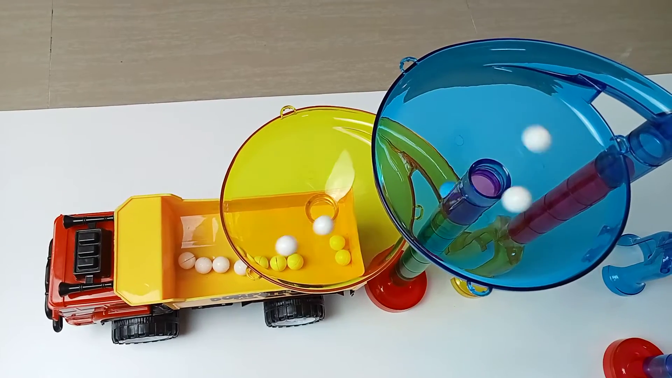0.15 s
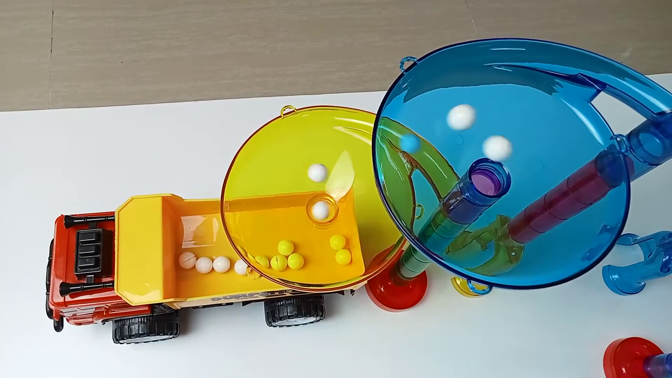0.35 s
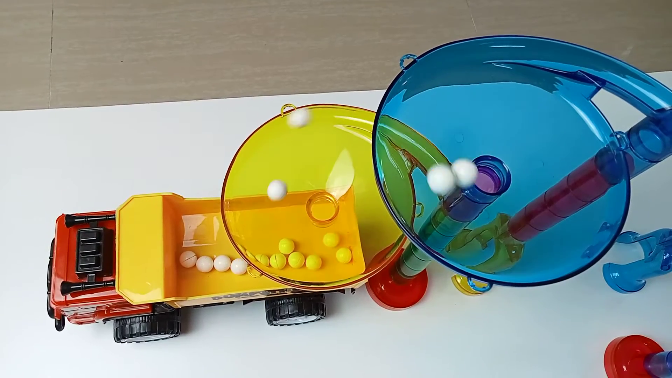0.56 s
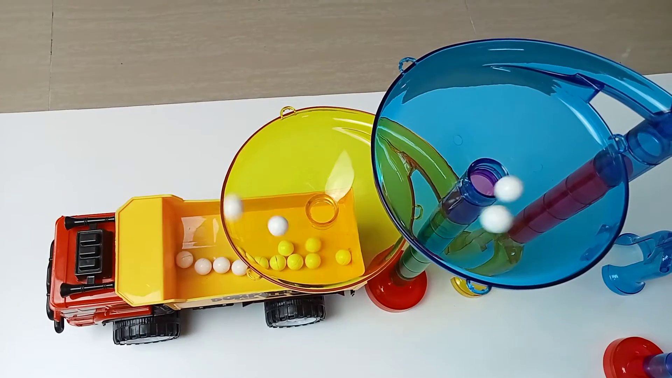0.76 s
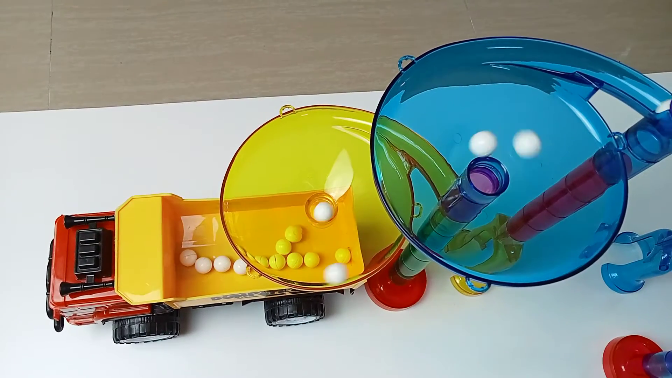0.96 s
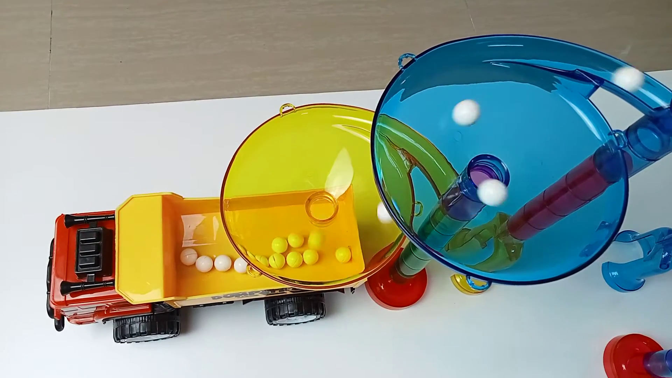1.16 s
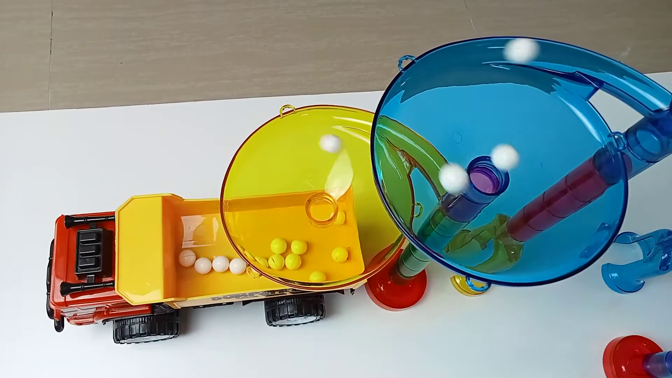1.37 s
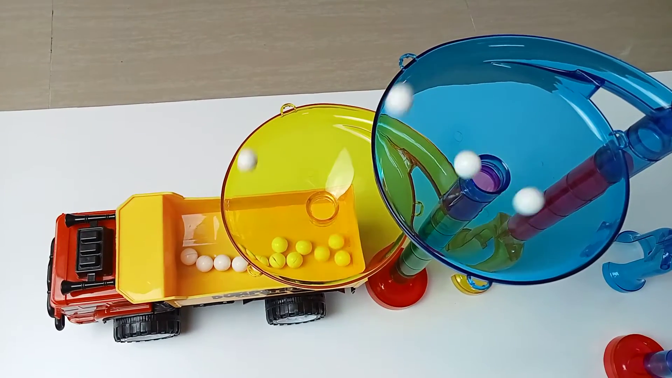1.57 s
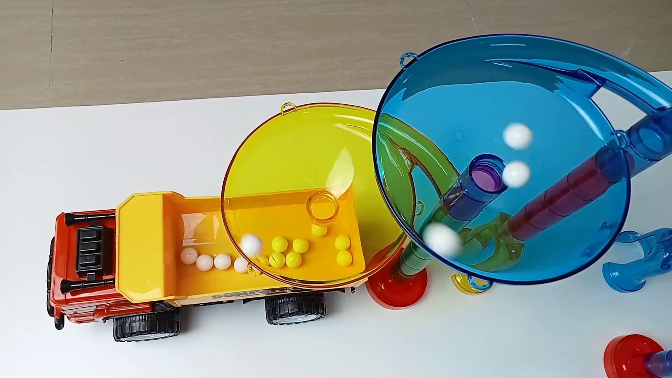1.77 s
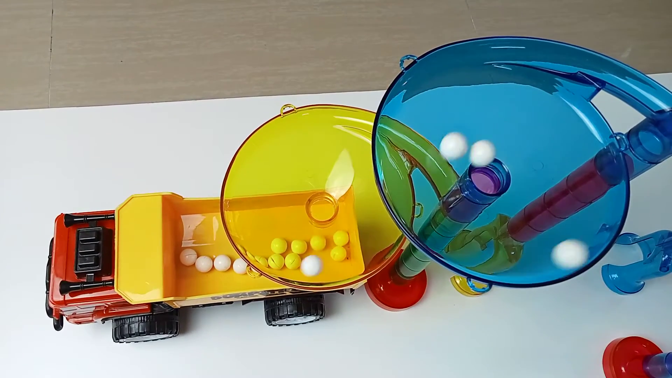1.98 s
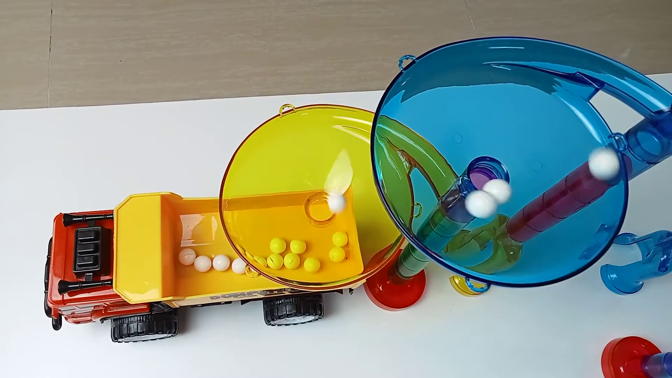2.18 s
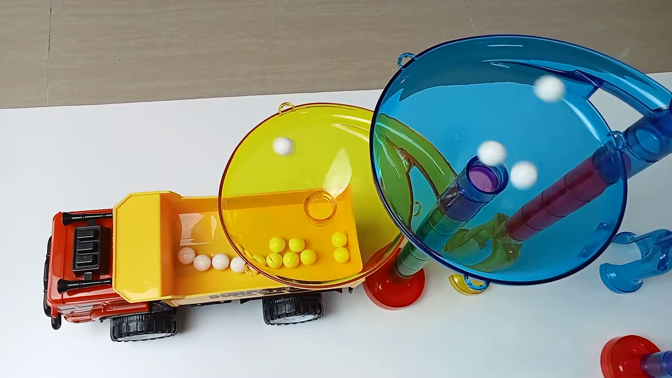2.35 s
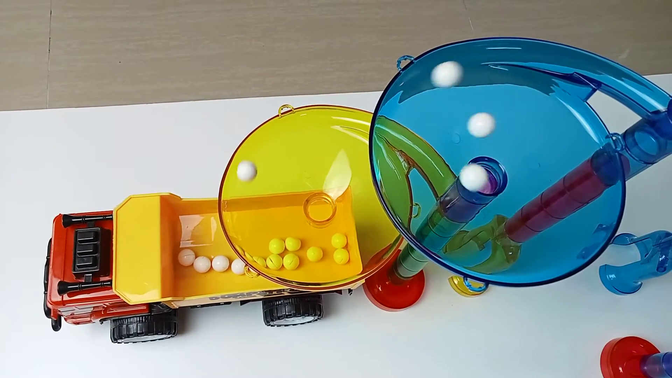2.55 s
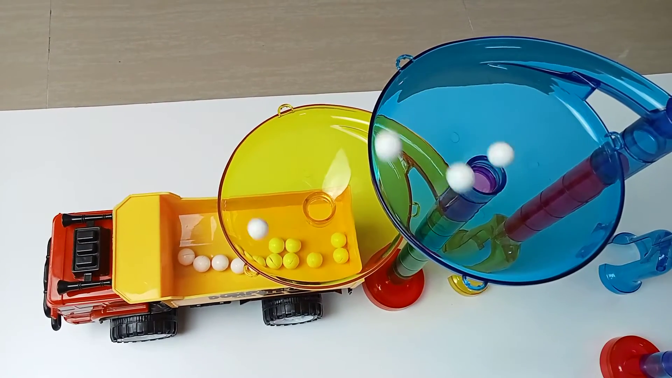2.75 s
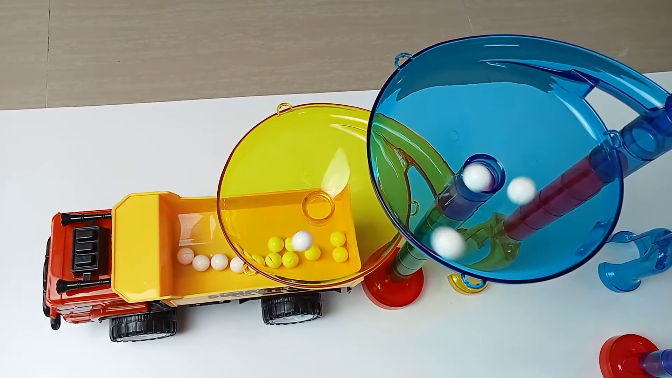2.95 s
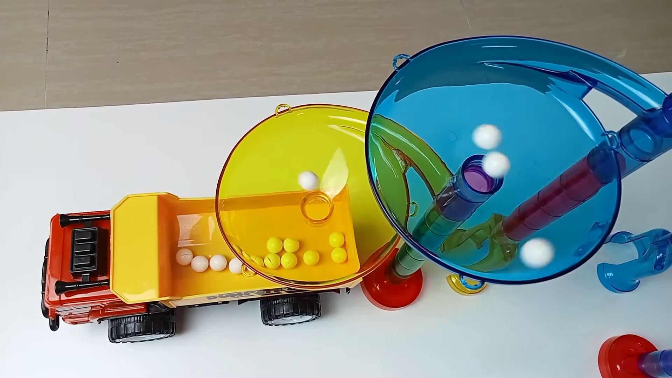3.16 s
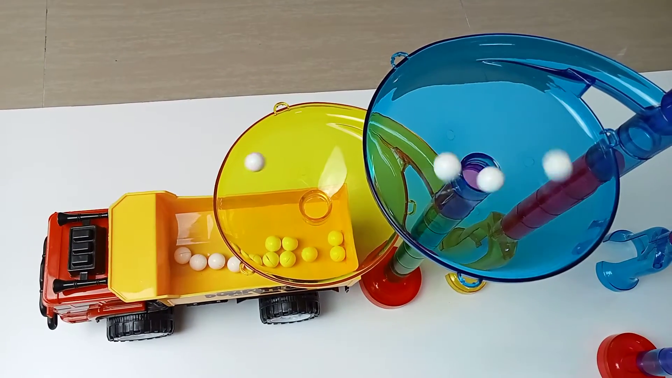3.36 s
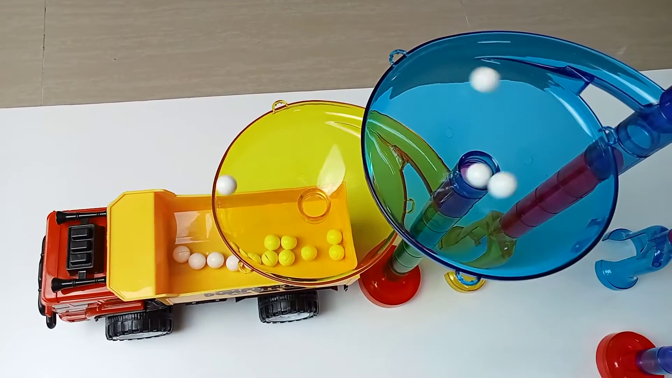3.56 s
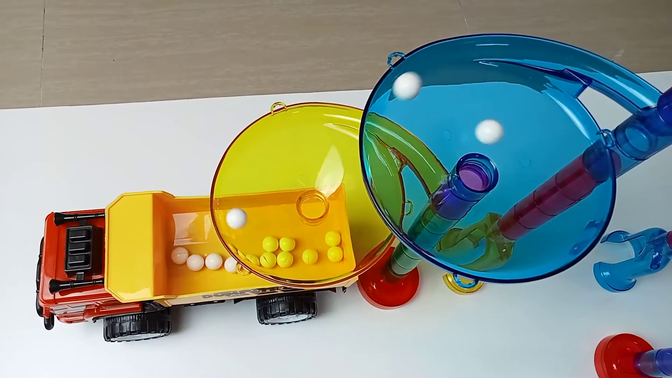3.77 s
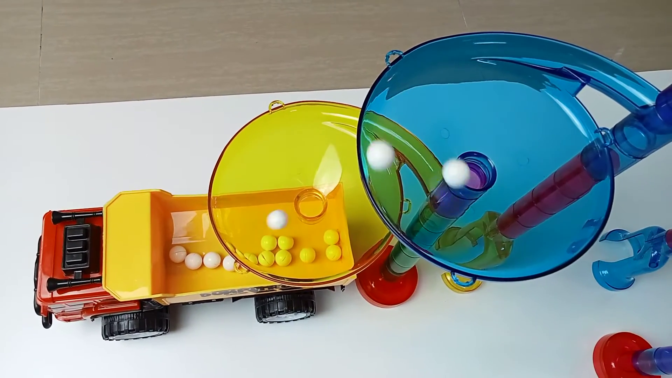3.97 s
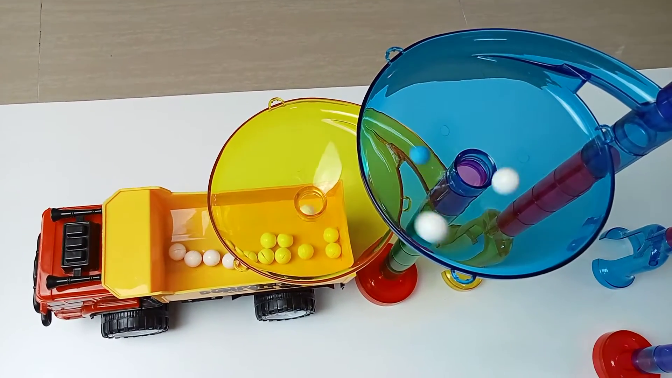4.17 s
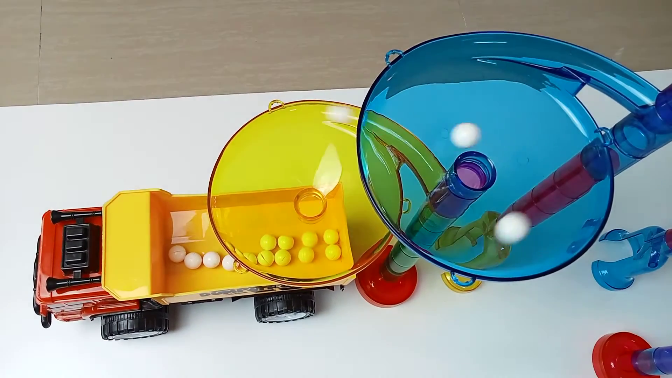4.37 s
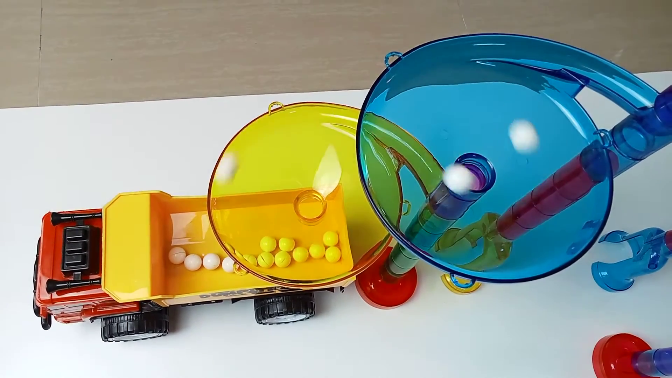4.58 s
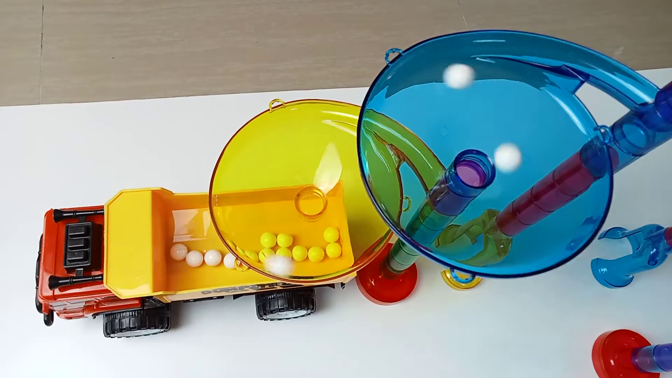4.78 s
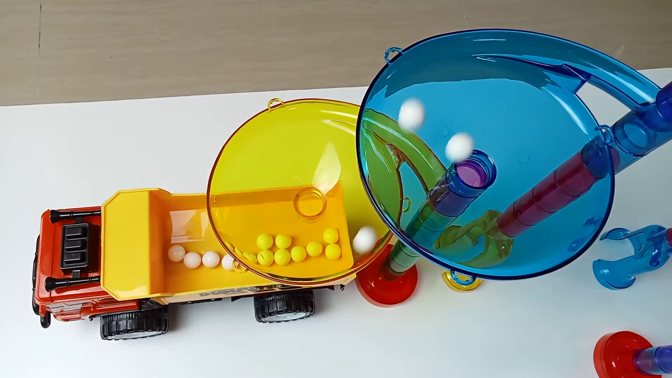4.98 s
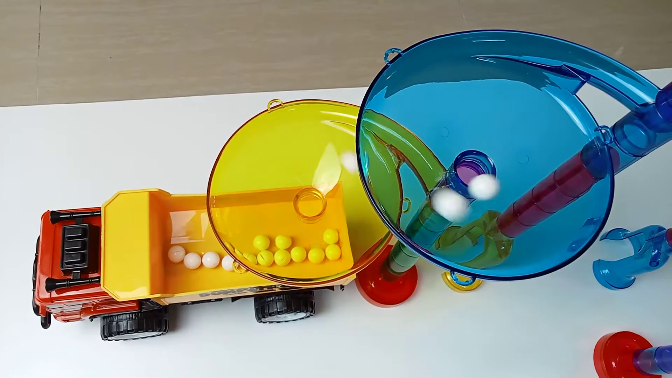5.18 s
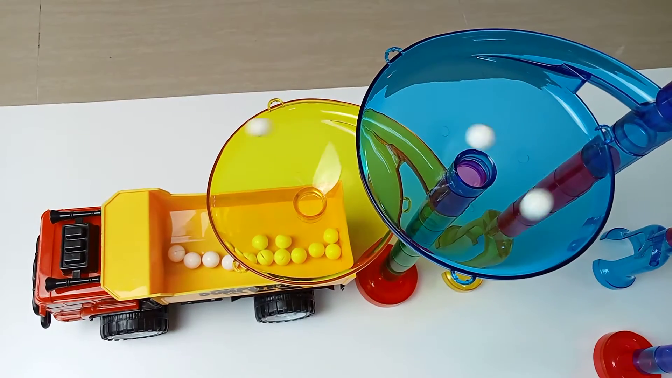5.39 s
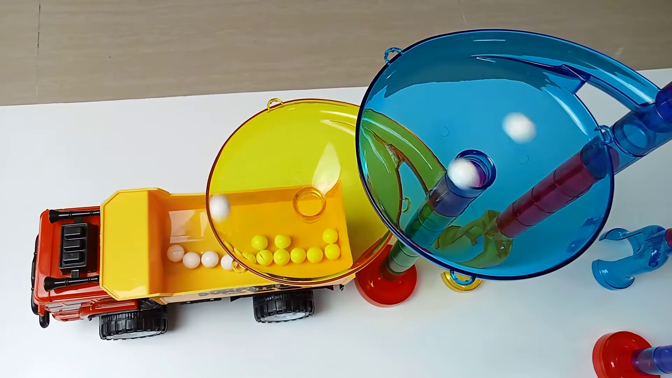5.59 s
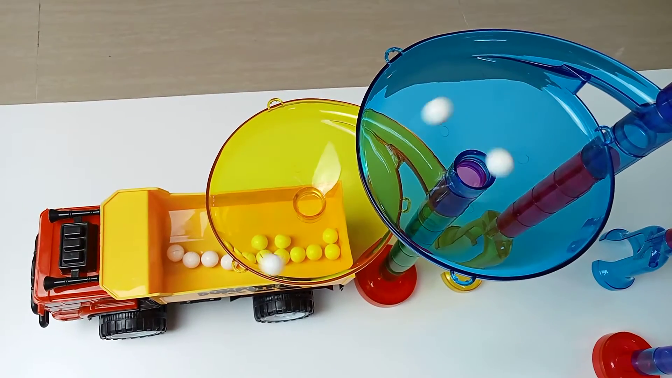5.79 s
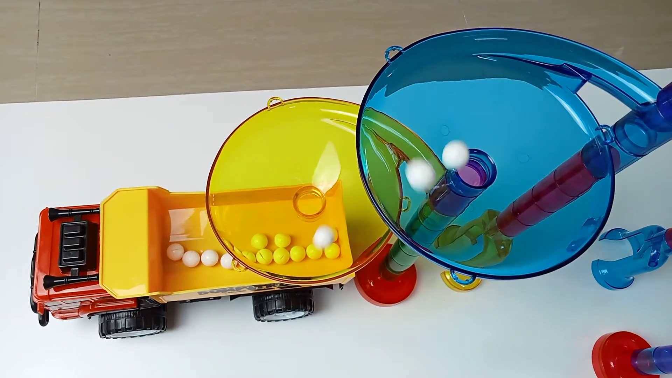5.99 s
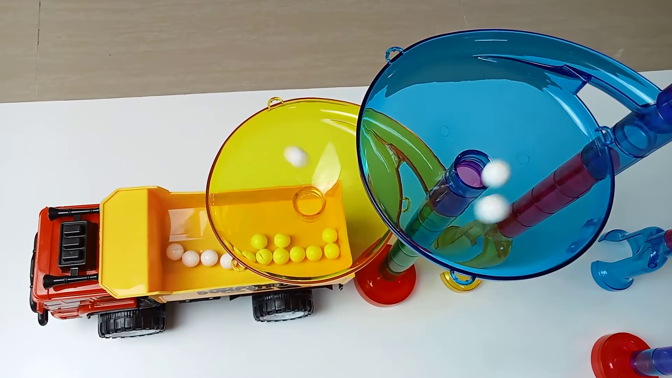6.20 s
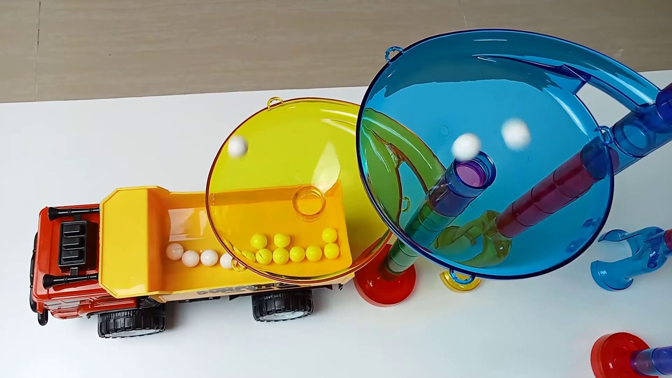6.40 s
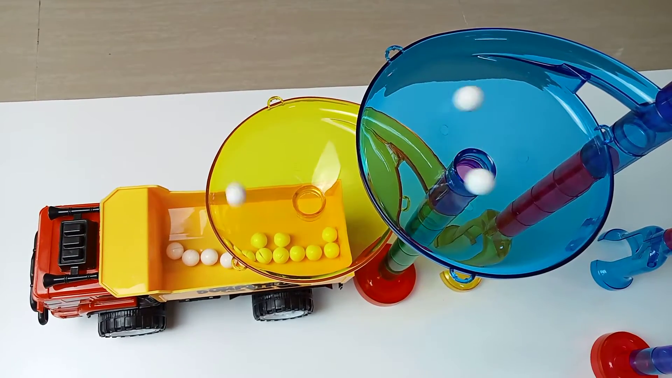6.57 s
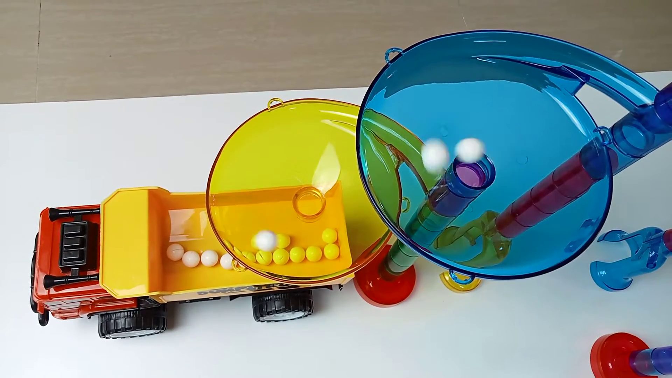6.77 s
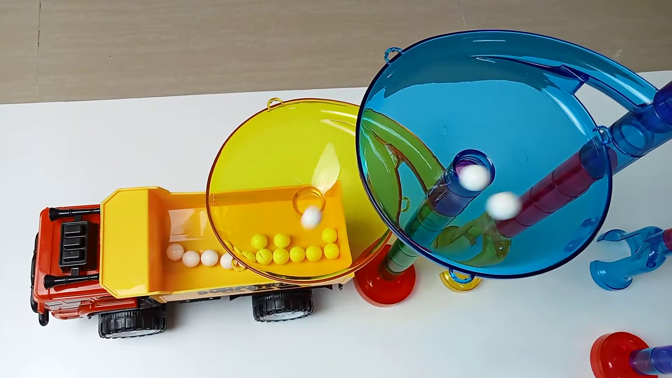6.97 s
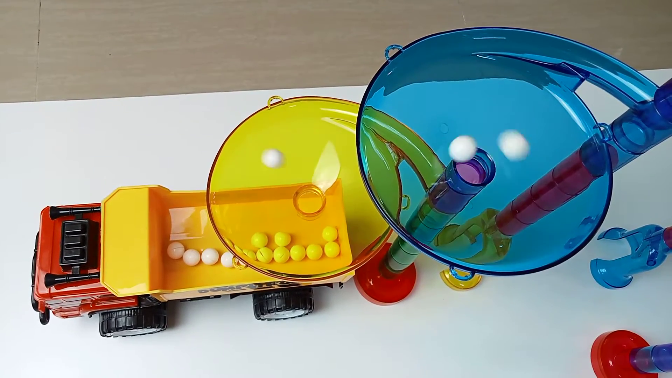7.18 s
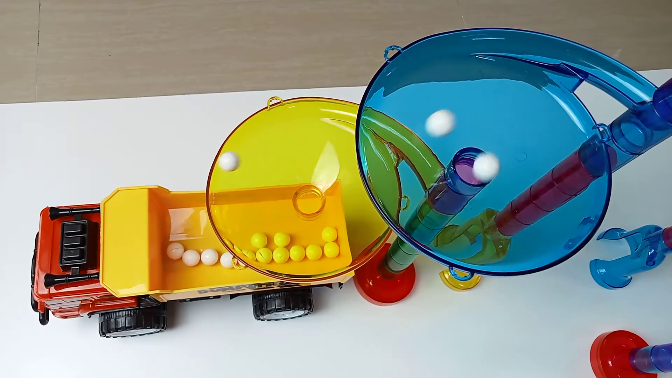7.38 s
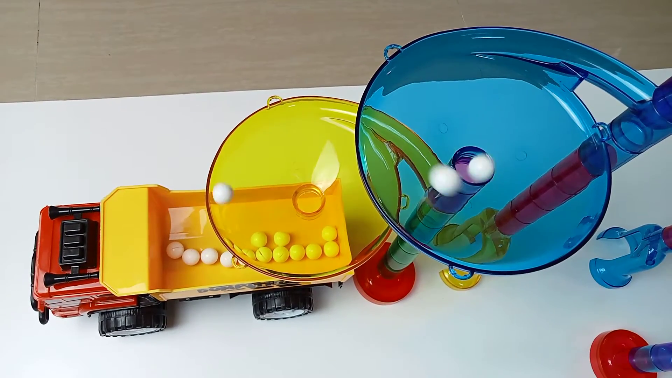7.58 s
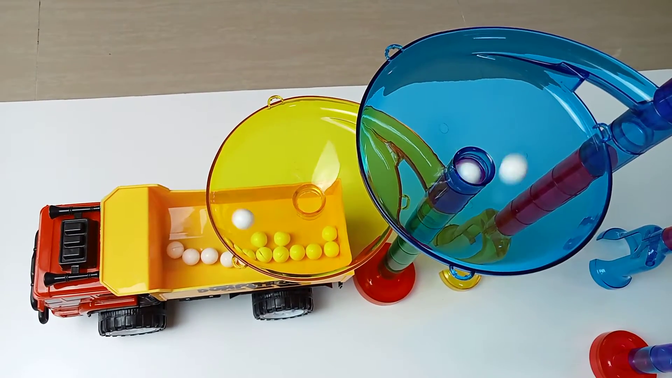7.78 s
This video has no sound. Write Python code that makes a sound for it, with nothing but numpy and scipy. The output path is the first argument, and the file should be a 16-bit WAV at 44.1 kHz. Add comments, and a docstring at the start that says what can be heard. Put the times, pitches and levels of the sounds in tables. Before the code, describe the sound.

Close up in a live, bare room, small hard balls run through thin plastic over faint low room noise and hum. A sharp, dense rattle opens the first 0.15 s, with a tiny high ping as two balls meet. Lighter clatters follow at 0.35-0.5, 0.7-0.95 and 1.1-1.2 s. A ball drops into a funnel at 0.6 s with a hollow clack and quickening, softening bounces; another lands at 1.3 s, with weaker ones at 1.7 and 1.9. Rumbling, raspy circling continues throughout, gently swelling and fluttering. Dry ticks gather between 1.75 and 2.7 s, with a grainy skitter at 2.3 and another at 3.2. The strongest clatter returns from 3.65 to 4.25 s, with high pings near 4.0 and 4.15. A bright, hollow drop bounces at 4.35, a faint one at 4.65. Afterwards balls keep circling, with scattered ticks and brief chirping scrapes, ending on a firmer tick near 7.8 s.

```python
"""Small hard balls run a plastic marble run in a live room, close to one microphone.
Room noise, a faint hum and a funnel rumbling under circling balls (noisy bumps through resonances) run throughout.
Balls clatter down the track (bursts of dying modes) until 1.2 s, with a high sine ping as two meet.
From 0.6 s some drop into the funnel, clack hollowly and bounce; ticks join at 1.2 s, grainy skitters at 2.3 s.
More clatter comes from 3.65 s and drops from 4.3 s; then the balls circle and tick to the end."""
import sys
import numpy as np
from scipy import signal
from scipy.fft import rfft, irfft, next_fast_len
from scipy.io import wavfile
from scipy.ndimage import map_coordinates

SR = 44100
rng = np.random.default_rng(int(sys.argv[2]) if len(sys.argv) > 2 else 0)


def int16_out(signal):
    """Quantize to a 16-bit WAV file."""
    q = np.round(np.clip(np.atleast_2d(signal).T, -1, 1) * 32767)
    wavfile.write(sys.argv[1], SR, q.astype(np.int16))


N = 345744

SIZE = 8192  # samples in one impact
IMPACT_S, HZ = np.arange(SIZE) / SR, np.fft.rfftfreq(SIZE, 1 / SR)
TOP_HZ = 15700  # the microphone's upper band limit
RATTLES_PER_S, NOTE_T60_S = 60, 0.073
FLIGHT_SHRINK, CLACK_LOSS_DB = .7, 7  # from one bounce to the next
RASP_GROWS = 1.46  # the rasp's level swings this many times as far in dB as the rumble's

# All table levels are relative; each layer is set in scene().
# Room noise spectrum: (frequency [Hz], level [dB])
AIR_COLOUR = [(20, -14), (45, -11), (100, 11), (200, -2), (400, -2.5), (1000, -16), (4000, -36),
              (16000, -69.5)]
# Appliance hum partials: (frequency [Hz], level [dB])
HUM_PARTIALS = [(96.9, -90), (242.2, -62), (290.7, -65.5), (484.5, -59)]
# Circling balls: (time [s], rolling level [dB])
ROLLING_LEVEL = [(0, -29), (.3, -39.5), (1.2, -40.5), (1.28, -43), (1.84, -38), (1.95, -44), (2.22, -42.5),
                 (2.34, -36), (2.66, -40), (3.5, -38.5), (3.68, -33.5), (3.78, -40), (4.92, -42),
                 (5.06, -38.5), (5.6, -38), (6.1, -41), (6.48, -38), (6.62, -41), (7, -41.5), (7.2, -38),
                 (7.33, -40.5), (7.65, -43), (7.84, -34.5)]
# Resonances of the thin plastic: (frequency [Hz], width [Hz], lift [dB])
PLASTIC_RESONANCES = [(671.5, 78.5, 12.5), (1255, 28, -1.5), (1372, 193, 7), (2057, 104, 3),
                      (3010, 22, 3.5), (3790, 510, 5.5), (7265, 506, 13), (12900, 410, 3.5)]
# Smooth colour of rolling, under those resonances: (frequency [Hz], level [dB])
ROLLING_COLOUR = [(100, -30), (500, -15), (850, -2), (1100, 8), (1550, 3), (1800, 3.5), (2600, -1.5),
                  (3700, -12.5), (4700, -27), (6000, -28.5), (8200, -30.5), (11000, -37), (16000, -45)]
# Smooth colour of track knocks, ticks, hops and skitters: (frequency [Hz], level [dB])
CONTACT_COLOUR = [(100, -17), (450, -8), (650, -5.5), (1000, 6), (1400, 7.5), (2400, 15), (3800, 5.5),
                  (4500, -5), (5700, -13.5), (9000, -18), (11000, -26), (15500, -21)]
# A ball rattles down a stretch of track: (start [s], end [s], rattle level [dB],
# wall ring before jitter [Hz], lingering note before jitter [Hz], note over knock [dB])
TRACK_RUNS = [(0.013, .15, -11, 4050, 1372, -7.5), (0.351, .43, -29, 3020, 1450, -7),
              (0.444, .5, -11, 3600, 1374, -8.5), (0.698, .95, -27.5, 3050, 2940, -2),
              (1.099, 1.21, -21.5, 2170, 1298, -3.5), (3.65, 3.76, -16, 3730, 1485, -9),
              (3.8, 3.987, -14.5, 3900, 1392, -12.5), (4.061, 4.24, -23, 2160, 1218, -14)]
# Hard knocks of those runs: (time [s], knock level [dB], crack level [dB])
HARD_KNOCKS = [(0.0248, -0.5, -21.5), (0.0334, -5.5, -19.5), (0.0395, -3, -17.5), (0.0692, -6.5, -20),
               (0.1311, -10, -20.5), (0.1418, -11, -18), (0.3534, -15.5, -31.5), (0.4455, -10.5, -35),
               (0.4532, -10.5, -19.5), (0.4637, -11, -28), (0.4728, -9, -28), (0.4934, -15, -20.5),
               (0.7143, -19, -25), (0.8025, -15, -27.5), (0.8614, -21, -24), (0.8812, -17, -20.5),
               (0.9125, -9.5, -16.5), (0.9207, -8.5, -19), (3.7194, -15, -37), (3.7323, -10.5, -20),
               (3.8077, 2.5, -18.5), (3.8211, 2, -22), (3.8641, -5.5, -31), (3.8948, -4, -23),
               (3.933, -2.5, -32), (3.9603, -7, -32), (3.9996, -1, -14.5), (4.0677, -4.5, -21),
               (4.12, -7, -21.5), (4.156, -8.5, -20), (4.212, -5, -40), (4.2217, -8, -23.5),
               (4.2462, -5.5, -28.5)]
# Ball meets ball: (time [s], level [dB], pitch [Hz])
BALL_PINGS = [(0.034, -13, 11900), (3.3368, -44.5, 12700), (4, -18.5, 12600), (4.1555, -23, 12600),
              (5.5139, -44, 13000), (6.8279, -48, 12100), (7.7308, -43, 12000)]
# A ball lands in the funnel: (time [s], thud level [dB], clack level [dB],
# first bounce's flight [s], thud loss per bounce [dB], ring of the struck spot [Hz])
FUNNEL_DROPS = [(0.596, -4, -15, .075, 10.5, 2080), (1.316, -2, -15.5, .0605, 8, 1900),
                (1.685, -22, -34, 0.049, 11, 1860), (1.874, -23, -49, 0.049, 11, 2120),
                (4.341, -7.5, -11.5, .082, 6, 2830), (4.642, -24, -41, 0.1, 6, 2530)]
# Smooth colour of funnel clacks: (frequency [Hz], level [dB])
CLACK_COLOUR = [(200, -108), (900, 7), (1400, -2), (1800, -7), (2600, 3), (3300, -5), (4000, -11.5),
                (5500, -21), (8500, -21.5), (11000, -29), (16000, -37)]
# Bending modes of the funnel before jitter: (frequency [Hz], level [dB], t60 [s])
BOWL_MODES = [(426, -17, 0.05), (496, -8, 0.031), (628, -8.5, 0.037), (790, 2, 0.045), (895, 6, 0.045),
              (983.5, 1.5, 0.066), (1140, -8, 0.023)]
# Circling balls touch or land firmly after a hop: (time [s], knock level [dB], crack level [dB])
FIRM_TICKS = [(1.1813, -35, -51), (1.7474, -28, -43), (1.8467, -19, -40.5), (2.1655, -23.5, -53),
              (2.2727, -17.5, -46), (2.3814, -17.5, -45), (2.4912, -17.5, -44), (2.5551, -15, -32.5),
              (2.604, -21, -40.5), (2.7177, -20, -45), (3.235, -19.5, -47), (4.7167, -18.5, -44.5),
              (5.4266, -22, -43.5), (5.5162, -15.5, -38.5), (5.57, -20, -45), (5.705, -15.5, -36.5),
              (6.4669, -15.5, -37), (6.8987, -26, -44.5), (7.1501, -20, -51), (7.3149, -27.5, -48),
              (7.3868, -26.5, -50), (7.5256, -15, -42), (7.6817, -23.5, -52), (7.8314, -13.5, -29.5)]
# A ball skitters in very fast bounces: (time [s], length [s], level [dB], starting pitch [Hz])
FAST_SKITTERS = [(2.3, 0.055, -39.5, 2550), (3.222, 0.033, -34, 2200), (4.6, 0.04, -35.5, 1400),
                 (6.2, 0.086, -42, 2300), (6.806, 0.049, -40.5, 2200), (7.136, 0.053, -37.5, 2170),
                 (7.716, .06, -41, 2000)]
# Decay of the room: (frequency [Hz], t60 [s])
ROOM_DECAY = [(200, 0.52), (900, 0.7), (2900, 0.61), (4200, 0.43), (7500, 0.51), (15000, 0.21)]


def amp(db):
    """Decibels to amplitude."""
    return 10 ** (np.asarray(db) / 20)


def unit(x):
    """Scale to rms 1."""
    return x / np.sqrt(np.mean(x ** 2) + 1e-20)


def along(points, hz):
    """Interpolate (frequency, value) points on a log frequency axis."""
    f, v = np.transpose(points)
    return np.interp(np.log(hz + 1), np.log(f + 1), v)


def wobble(rate, size=N):
    """A smooth random curve with rate knots a second."""
    knots = rng.standard_normal(int(size * rate / SR) + 4)
    return map_coordinates(knots, [np.arange(size) * rate / SR])


def filtered(x, gain):
    """Apply a gain that depends on frequency."""
    m = next_fast_len(N + SIZE)
    return irfft(rfft(x, m) * gain(np.fft.rfftfreq(m, 1 / SR)), m)[:N]


def add(track, s, sound):
    """Mix a sound in at time s [s]."""
    i = int(np.clip(round(s * SR), 0, N - 1))
    track[i:i + len(sound)] += sound[:N - i]


def causal(gain):
    """The quickest (minimum-phase) impulse response that has this gain."""
    cepstrum = irfft(np.log(np.maximum(gain, 1e-6)))
    cepstrum[1:SIZE // 2] *= 2
    cepstrum[SIZE // 2 + 1:] = 0
    return irfft(np.exp(rfft(cepstrum)))


def plastic(colour, split_hz, spot_db=0):
    """Impulse responses of a resonant plastic part, below and above a split frequency."""
    lift = sum(db * np.exp(-.5 * ((HZ - hz) / width) ** 2) for hz, width, db in PLASTIC_RESONANCES)
    gain = amp(along(colour, HZ) + lift + spot_db)
    low = 1 / (1 + (HZ / split_hz) ** 10)
    return causal(gain * np.sqrt(low)), causal(gain * np.sqrt(1 - low))


def spot(hz, width, db):
    """Extra resonance of the struck place, in dB over frequency; width is a fraction of hz."""
    return db / (1 + ((HZ - hz) / (width * hz)) ** 2)


def even(sound):
    """Give a blow the energy of 5 ms at rms 1."""
    return sound / np.sqrt(np.sum(sound ** 2) / (.005 * SR))


def blow(body, t60, contact=0.18):
    """A sharp contact, then a new mix of crowded, quickly dying modes."""
    burst = rng.standard_normal(SIZE) * amp(-60 * IMPACT_S / t60)
    burst[0] = contact * np.linalg.norm(burst)
    return even(irfft(rfft(burst) * rfft(body)))


def bumps(rate, spread_db):
    """Random tiny impacts of uneven size, about rate a second, rms 1."""
    hits = rng.random(N) < rate / SR
    signs = rng.choice([-1, 1], N)
    sizes = amp(spread_db * np.clip(rng.standard_normal(N), -2, 2))
    return unit(hits * signs * sizes)


def whirr(hz, width):
    """A resonance driven by chance while its centre moves, rms 1."""
    phase = 2 * np.pi * np.cumsum(hz) / SR
    in_phase = wobble(width, size=len(hz)) * np.cos(phase)
    return unit(in_phase + wobble(width, size=len(hz)) * np.sin(phase))


def background(air_db, hum_db):
    """Low room noise and a slightly unsteady appliance hum of phase-wandering partials."""
    t = np.arange(N) / SR
    air = unit(filtered(rng.standard_normal(N), lambda hz: amp(along(AIR_COLOUR, hz))))
    hum = sum(amp(db) * unit(np.sin(2 * np.pi * hz * t + .6 * wobble(2.7))) for hz, db in HUM_PARTIALS)
    return amp(air_db) * air + amp(hum_db) * hum


def rolling(rumble_db, rasp_db, hollow_db, hop_db, flutter_db, hollow_hz):
    """Surface bumps drum on the funnel; fast balls rasp and skip in little hops."""
    s, db = np.transpose(ROLLING_LEVEL)
    rumble_level = np.interp(np.arange(N) / SR, s, db)
    rasp_level = db.mean() + RASP_GROWS * (rumble_level - db.mean()) + wobble(9)
    low, high = plastic(ROLLING_COLOUR, split_hz=1930)
    load = flutter_db * wobble(70)  # the pressure varies as the balls turn

    rumble = amp(rumble_level + rumble_db + load) * bumps(rate=2000, spread_db=1.5)
    rasp = amp(rasp_level + rasp_db + load) * bumps(rate=1200, spread_db=0.0)
    out = signal.fftconvolve(rumble, low / np.linalg.norm(low))
    out += signal.fftconvolve(rasp, high / np.linalg.norm(high))

    # the bowl's hollow note wanders as the balls move round it
    hollow = whirr(hollow_hz * (1 + .035 * wobble(8)), width=250)
    out = out[:N] + amp(rumble_level + hollow_db + load) * hollow

    # each little hop lands with a tap and a thin click
    wall, skin = plastic(CONTACT_COLOUR, split_hz=8800)
    for when, size in rng.random(size=(130, 2)):
        level = rumble_level[int(when * N)] + hop_db + 11 * size ** 2
        tap = blow(wall, t60=0.021)
        click = amp(-15.5) * blow(skin, t60=.012)
        add(out, when * N / SR, amp(level) * (tap + click))
    return out


def knock(knock_db, crack_db, ring_hz, note_hz, note_db):
    """A ball strikes a part of the track: its wall clacks, its edge glints and one note lingers."""
    part = spot(ring_hz * (1 + rng.normal(0, .04)), width=.07, db=8)
    glint = spot(8800 + 5000 * rng.random(), width=0.036, db=14.0)
    wall, skin = plastic(CONTACT_COLOUR, split_hz=5520, spot_db=part + glint)
    body, edge = blow(wall, t60=.027, contact=.15), blow(skin, t60=.025, contact=.25)
    fade = amp(-60 * IMPACT_S / NOTE_T60_S) * (1 - np.exp(-IMPACT_S / .001))
    note = even(fade * np.sin(2 * np.pi * note_hz * (1 + rng.normal(0, 0.011)) * IMPACT_S))
    return amp(knock_db) * (body + amp(note_db) * note) + amp(crack_db) * edge


def rattles(level_db, crack_db, spread_db, size=20):
    """Between the hard knocks the ball chatters against the track in light, uneven contacts."""
    out = np.zeros(N)
    for start, end, db, *part in TRACK_RUNS:
        for k, (slip, force) in enumerate(rng.random((size, 2))):
            s = start + (k + slip) / RATTLES_PER_S
            level = db + level_db + spread_db * (2 * force - 1)
            add(out, s, (s < end) * knock(level, level + crack_db, *part))  # silent past the run's end
    return out


def knocks(knock_db, crack_db):
    """Each hard knock rings the stretch of track that the ball is passing."""
    out = np.zeros(N)
    for s, body, crack in HARD_KNOCKS:
        # the run that holds this time, or lies nearest to it
        _, _, _, *part = min(TRACK_RUNS, key=lambda run: max(run[0] - s, s - run[1]))
        add(out, s, knock(body + knock_db, crack + crack_db, *part))
    return out


def pings(level_db, t60):
    """Colliding balls ring for a moment at one high pitch."""
    out = np.zeros(N)
    for s, db, hz in BALL_PINGS:
        add(out, s, amp(db + level_db - 60 * IMPACT_S / t60) * np.sin(2 * np.pi * hz * IMPACT_S))
    return out


def flex():
    """The whole bowl bends at new mode strengths and pitches; its deepest motion hardly radiates."""
    ring = np.zeros(SIZE)
    for hz, db, t60 in BOWL_MODES:
        fade = amp(db + rng.normal(0, 0.97) - 60 * IMPACT_S / t60)
        pitch = hz * (1 + rng.normal(0, 0.0457))
        ring += fade * np.sin(2 * np.pi * (pitch * IMPACT_S + rng.random()))
    rise = 1 - np.exp(-IMPACT_S / .0006)
    radiation = signal.butter(5, 370, "highpass", fs=SR, output="sos")
    return even(signal.sosfilt(radiation, ring * rise))


def drops(thud_db, clack_db, crack_db, clack_t60, crack_t60, count=3):
    """A falling ball cracks on the funnel and flexes its bowl, landing softer and sooner each bounce."""
    thuds, clacks = np.zeros(N), np.zeros(N)
    for s, thud, clack, flight, loss, hz in FUNNEL_DROPS:
        wall, skin = plastic(CLACK_COLOUR, split_hz=6300, spot_db=spot(hz, width=0.28, db=11))
        for bounce in range(count):
            crack = amp(crack_db - 3.3 * bounce) * blow(skin, crack_t60)  # gentler landings are duller
            add(thuds, s, amp(thud + thud_db - loss * bounce) * flex())
            clack_amp = amp(clack + clack_db - CLACK_LOSS_DB * bounce)
            add(clacks, s, clack_amp * (blow(wall, clack_t60) + crack))
            s += flight * FLIGHT_SHRINK ** bounce
    return thuds, clacks


def ticks(knock_db, crack_db, thump_db, knock_t60, crack_t60):
    """Firm contacts in the funnel tick and thump its bowl."""
    out = np.zeros(N)
    wall, skin = plastic(CONTACT_COLOUR, split_hz=6100)
    bowl, _ = plastic(CONTACT_COLOUR, split_hz=1420)
    for s, db, crack in FIRM_TICKS:
        add(out, s, amp(db + knock_db) * blow(wall, knock_t60))
        add(out, s, amp(crack + crack_db) * blow(skin, crack_t60))
        add(out, s, amp(db + thump_db) * blow(bowl, knock_t60))
    return out


def skitters(level_db, scrape_db, width, glide):
    """Bounces too quick to count merge into a grainy scrape and a rough, rising chirp."""
    chirps, pressure = np.zeros(N), np.zeros(N)
    for s, length, db, hz in FAST_SKITTERS:
        u = np.linspace(0, 1, int(length * SR))
        swell = amp(db) * np.sin(np.pi * u)
        add(chirps, s, swell * whirr(hz * (1 + glide * u), width))
        add(pressure, s, swell)
    wall, _ = plastic(CONTACT_COLOUR, split_hz=3500)
    grains = pressure * bumps(rate=1200, spread_db=5.5)
    scrape = signal.fftconvolve(grains, wall / np.linalg.norm(wall))[:N]
    return amp(level_db) * chirps + amp(scrape_db) * scrape


def room(x, build_up):
    """Bare walls answer with a noise tail whose highest treble dies first; build_up in seconds."""
    hz, t, z = signal.stft(rng.standard_normal(SR), SR, nperseg=256)
    decay = amp(-60 * t / along(ROOM_DECAY, hz)[:, None])
    tail = signal.istft(z * decay, SR, nperseg=256)[1]
    tail *= 1 - np.exp(-np.arange(len(tail)) / SR / build_up)
    return signal.fftconvolve(x, tail / np.linalg.norm(tail))[:N]


def scene():
    """Everything rattles close to the microphone; the walls return the clacks most strongly."""
    circling = rolling(rumble_db=-5.5, rasp_db=-7.5, hollow_db=-5, hop_db=-6.5, flutter_db=3.5, hollow_hz=1511)
    clatter = rattles(level_db=-12, crack_db=-14, spread_db=5) + knocks(knock_db=-12.5, crack_db=-2.5)
    thuds, clacks = drops(thud_db=-6.5, clack_db=1.5, crack_db=-12, clack_t60=0.041, crack_t60=0.034)
    circling += ticks(knock_db=-14.0, crack_db=-2.0, thump_db=-12.5, knock_t60=0.069, crack_t60=0.035)
    circling += skitters(level_db=2.5, scrape_db=1, width=287, glide=0.0625)
    near = thuds + clacks + clatter + circling + pings(level_db=2, t60=0.016)
    # how much of each source reaches the walls
    scattered = amp(-10.5) * thuds + amp(-3) * clacks + amp(-7.0) * clatter + amp(-8.0) * circling
    return (near + room(scattered, build_up=0.0014) + background(air_db=-58.5, hum_db=-5.5))[None]


def record(dry):
    """The microphone rounds off the highest peaks and cuts steeply above its band limit."""
    rounded = dry[0] / (1 + np.abs(dry[0]) ** 6) ** (1 / 6)
    return filtered(rounded, lambda hz: 1 / np.sqrt(1 + (hz / TOP_HZ) ** 160))[None]


dry = scene()
out = record(dry)
int16_out(out)
```